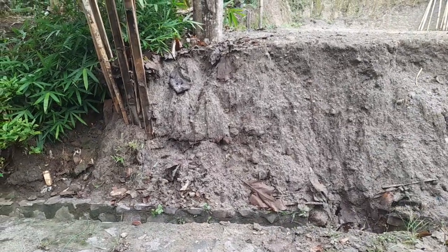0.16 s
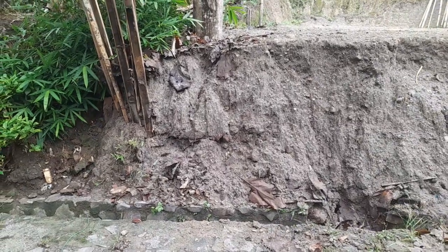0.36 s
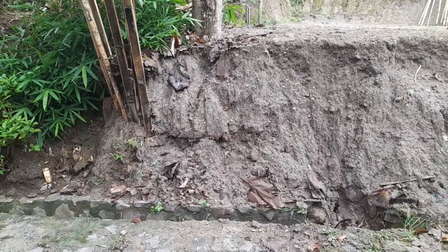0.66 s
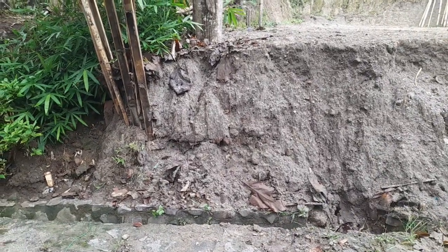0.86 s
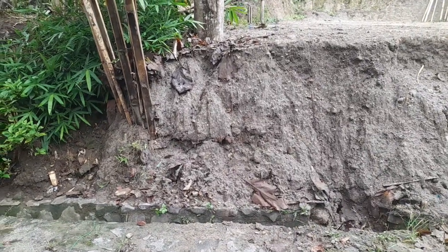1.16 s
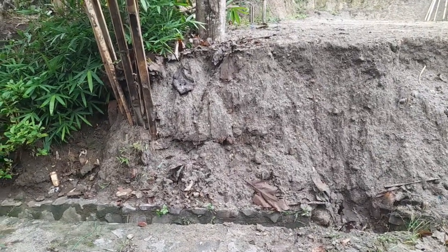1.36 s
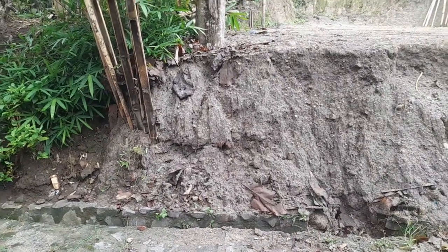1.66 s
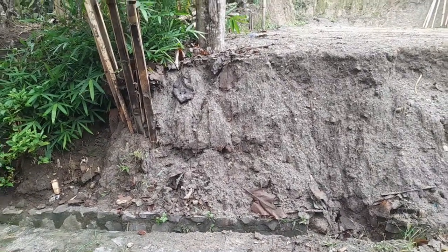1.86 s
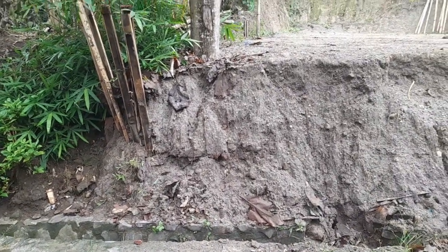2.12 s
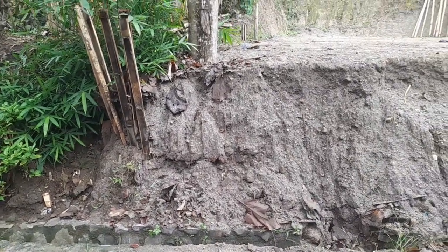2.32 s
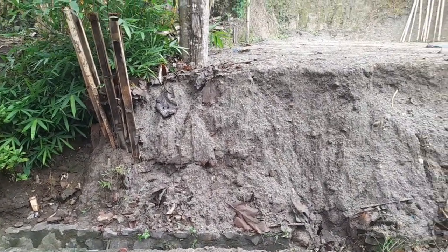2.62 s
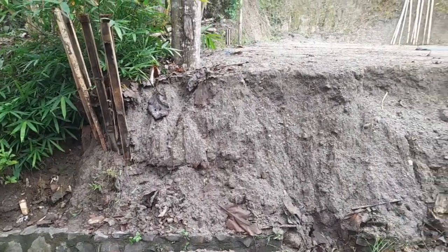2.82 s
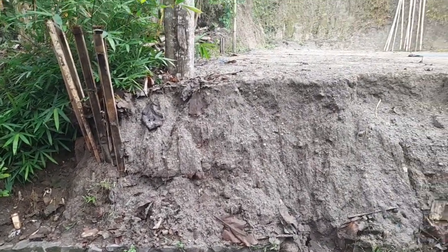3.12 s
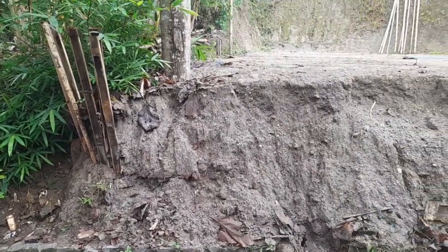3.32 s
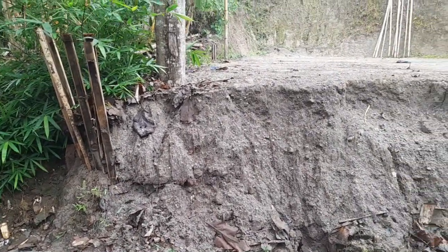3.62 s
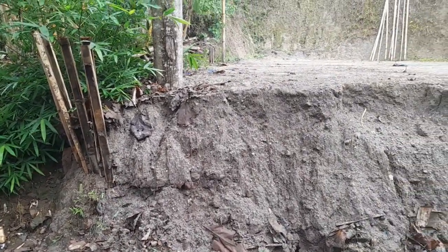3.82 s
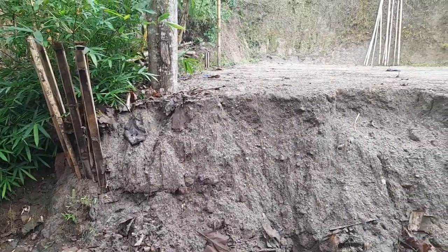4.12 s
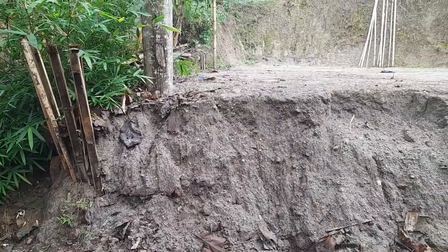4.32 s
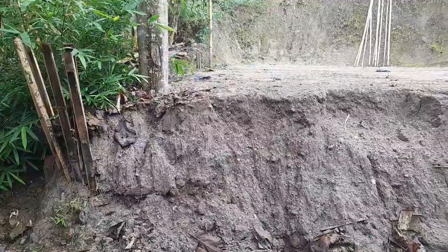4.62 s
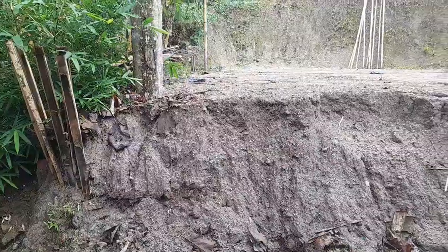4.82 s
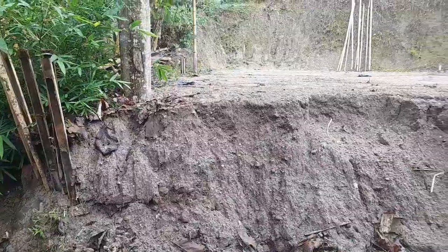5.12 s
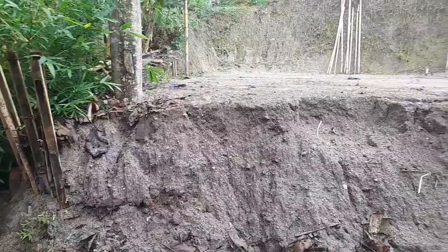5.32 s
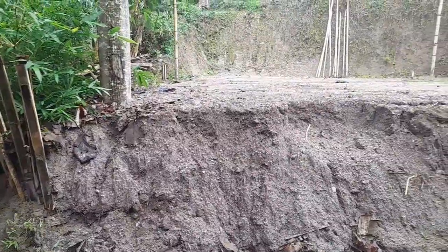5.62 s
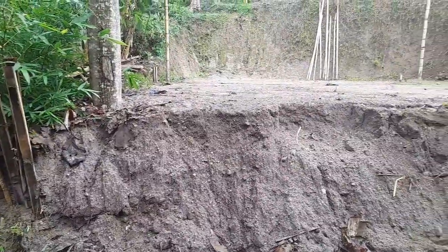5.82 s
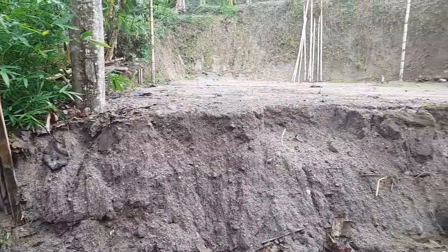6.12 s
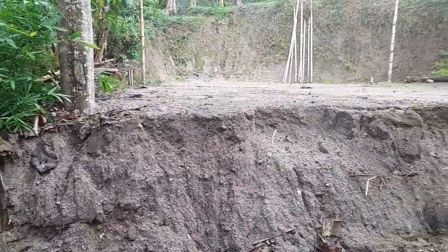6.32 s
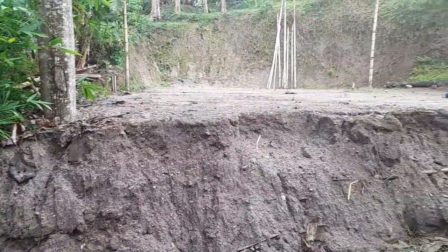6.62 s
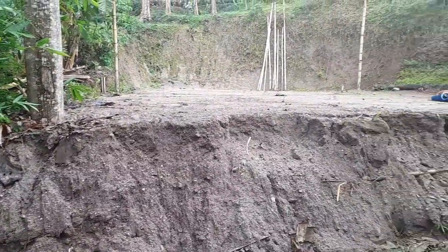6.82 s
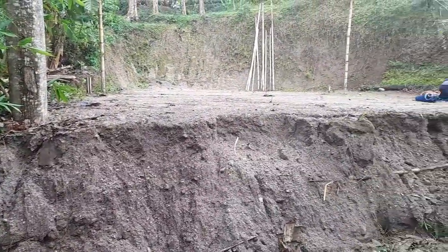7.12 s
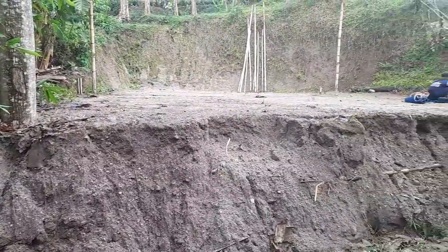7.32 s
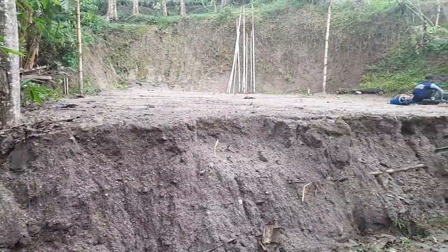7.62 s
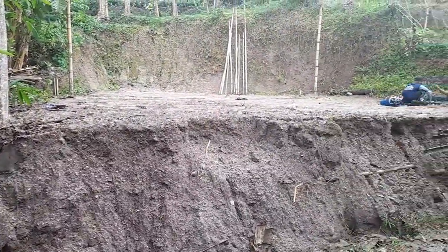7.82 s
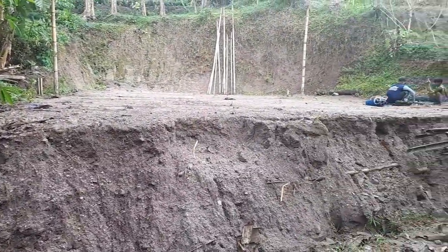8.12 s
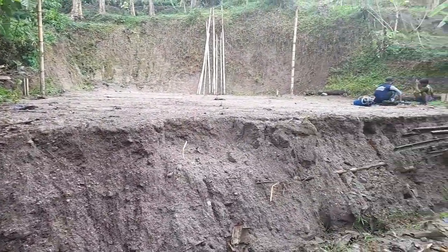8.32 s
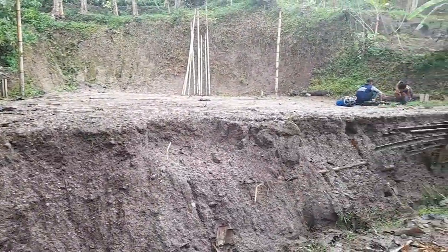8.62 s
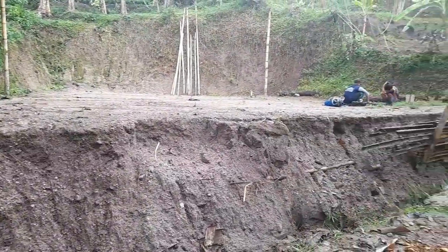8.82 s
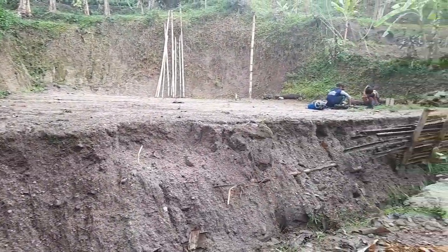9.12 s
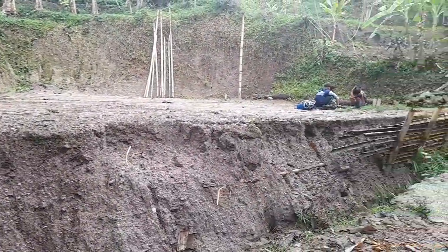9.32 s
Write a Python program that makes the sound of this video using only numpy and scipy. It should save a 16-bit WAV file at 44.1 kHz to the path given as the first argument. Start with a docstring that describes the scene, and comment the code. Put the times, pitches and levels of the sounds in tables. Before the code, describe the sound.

An open, leafy yard picked up by a handheld phone, with soft tree echoes. From 0 to 0.25 s a close rooster rasps, breaks into a clear, loud crow near 600 Hz that sinks until 1.2 s, and ends in a weaker hoarse croak by 1.3 s. Faint cheeps lie under it; from 1.65 to 3.3 s young fowl cheep brightly, four per second, each an arched chirp with a falling end. Dry ticks and scuffs sound nearby until about 3.3 s. From 3.5 to 6.2 s it is quieter: distant crows, a thin rising whistle near 5.2 s, far hoarse bursts, throbbing insects, low drone. Cheeps return from 6.4 to 7.9 s, overlapping, then weaker and irregular. From 8.1 s wind thumps low and lumpy to the end, with a far bird's quick scooping notes, falling calls and renewed rustle.

```python
"""Village yard with a rooster

A near rooster ends its crow hoarse, clear, then hoarse again: summed partials between bursts of rasp.
Young fowl cheep in gliding lines; small birds and far fowl are wavering tones with echoes from trees.
Shaped noise makes the throbbing insects mixed with the tops of cheeps, the blur of the cheeps' falling
ends, the air, a far drone, the rustle and ticks near the phone, and the gusts that thump its two
microphones in the last seconds."""
import sys
import numpy as np
from scipy import signal
from scipy.fft import rfft, irfft, next_fast_len
from scipy.io import wavfile
from scipy.ndimage import uniform_filter1d, map_coordinates

SR = 44100
rng = np.random.default_rng(int(sys.argv[2]) if len(sys.argv) > 2 else 0)


def generate_wav(sig):
    """Save sig (samples, or channels by samples) to the path in sys.argv[1] as 16-bit PCM at SR."""
    pcm = np.round(np.clip(np.atleast_2d(sig).T, -1, 1) * 32767).astype(np.int16)
    wavfile.write(sys.argv[1], SR, pcm)


N = 417186
T = np.arange(N) / SR

# Clear voice, held and then sinking: start_s, pitch_hz, level_db (before the throat), overtones_db (added)
CROW = [(.16, 580.6, -47, 2), (.2, 578, -42.5, 0.5), (.32, 612, -36, -3), (.43, 614.5, -35.5, -1),
        (.53, 618.5, -33, -14.5), (.594, 608.3, -35.5, -6.5), (.645, 592.7, -40, -5.5),
        (.69, 591.8, -37.5, -2), (.81, 573.6, -40.5, -4), (.92, 556.8, -47, 1.5), (1.096, 522, -61.5, 14),
        (1.164, 492, -58.5, 4.5), (1.21, 452, -62, 11)]
# Upper partials: partial_number, level_db (against the ninth)
UPPER_PARTIALS = [(9, -2.5), (10, -1.5), (11, -8), (12, -18), (14, -7.5)]
# Throat resonances; a partial swells as its pitch crosses a peak: frequency_hz, gain_db
THROAT = [(480, -9), (560, -10.5), (615, 1.5), (1100, -11.5), (1230, -11), (1580, -5), (1750, -16),
          (2150, -22.5), (2320, -6), (2400, -12.5), (2470, -17), (2900, -30.5), (3030, -11), (3110, -14),
          (3350, -9), (3700, -29.5), (4900, -41), (5500, -29.5)]
FADING_DB, FADING_PER_S = 1.8, 14.2  # moving air makes each overtone come and go


def clear_voice():
    """Source and filter: harmonics of one unsteady pitch, each weighted by the throat resonances."""
    hz, level_db, over_db = curves(CROW)
    phase = tone(hz, jitter=0.0023)
    stack = [(k, along(THROAT, k * hz)) for k in range(1, 7)]
    stack += [(k, along(THROAT, 9 * hz) + db) for k, db in UPPER_PARTIALS]
    voice = np.zeros(N)
    for k, throat_db in stack:
        partial_db = level_db + throat_db + 0.83 * wobble(25)
        if k > 1:
            partial_db += over_db + 2.7 * wobble(40.0) + FADING_DB * wobble(FADING_PER_S)
        voice += np.sqrt(2) * amp(partial_db) * np.sin(k * phase + k * k)
    return window(CROW) * voice


# The two rasps: start_s, lowest_resonance_db, upper_resonances_db, lowest_resonance_hz
RASP = [
    [(0.0, -40, -34.5, 707), (0.016, -34, -36.5, 690), (0.072, -37, -40, 688), (0.118, -32, -35.5, 689.7),
     (0.218, -48.5, -46, 639), (0.26, -79, -71, 634)],
    [(1.11, -78, -70, 738), (1.134, -50, -52.5, 720), (1.17, -48, -52, 682), (1.208, -65, -56, 759),
     (1.238, -45.5, -51.5, 754), (1.3, -87, -73, 763)],
]
# Upper resonances of the first and of the last rasp: frequency_hz, width_hz, level_db (relative)
BEAK = [(1524, 630, 2.5), (2145, 210, -0.5), (3360, 380, 0.5), (6390, 790, -24.5)], [(1435, 680, -5),
        (2440, 210, 4.5), (3350, 300, 1.5)]


def hoarse_voice():
    """Irregular vibration: the membranes lose their rhythm, and uneven air noise excites the resonances."""
    rasp = np.zeros(N)
    for rows, beak in zip(RASP, BEAK):
        low_db, high_db, low_hz = curves(rows)
        stutter = amp(1.5 * wobble(69.3))  # uneven bursts of air
        uneven_strength = np.tanh(0.76 + 0.77 * wobble(230))
        low = unit(uneven_strength * np.sin(tone(low_hz, jitter=0.02)))
        high = unit(filtered(stutter * rng.standard_normal(N), resonant(beak)))
        rasp += window(rows) * (amp(low_db) * low + amp(high_db) * high)
    return rasp


def rooster():
    """Superposition of direct and scattered sound for the clear and the hoarse voice."""
    # (Hz, left-right dB), then (Hz, radians the left port leads)
    lean = [(600, 0.0), (1250, -6.0), (1850, -7.5), (2400, -8), (3100, -6), (6000, -22)]
    skew = [(610, 0.73), (1220, 4.34), (1830, 4.7), (2440, 8.2), (3050, 11.4), (8000, 28.4)]
    spread = [(600, -6.0), (1200, 0), (3000, 2)]  # leaves scatter the higher partials more: (Hz, dB)
    voice, rasp = clear_voice(), hoarse_voice()
    clear = ports(voice + filtered(trees(voice), coloured(spread)), lean, skew)
    hoarse_lean = [(600, -4.0), (1500, -6.5), (3400, -8.0)]
    hoarse = ports(rasp + amp(-7.5) * trees(rasp), hoarse_lean, SKEW)
    return clear + hoarse


# One cheep at pace 1: start_s, even_fall_share and steep_fall_share (of the top pitch), level_db (relative),
# third_partial_db (relative), roughness (0-1, before each line's share)
CHEEP = [(0, 0.919, .94, -43, -12.5, .05), (.006, .915, 0.97, -6.5, -37, .05),
         (0.018, 0.94, 0.96, -4.5, -10, .05), (.024, 0.98, 0.98, 3.5, -11, 0.13),
         (.045, 0.96, 0.95, -1, -1.7, 0.37), (.065, .92, 0.98, 3.5, -3.5, 0.71),
         (.085, .85, .89, 4.5, -3.5, 0.37), (.105, .76, .72, 5, -10, 0.22),
         (0.117, .69, .6, -3.5, -14, 0.14), (0.127, 0.84, .55, -47, -24, .3)]
# All cheeps: start_s, top_pitch_hz, direct_db, echo_db (both before shape and throat), pace,
# lateness_of_fall (0-1)
CHEEPS = [(.195, 962, -56, -52.5, 1.58, 0.27), (.432, 960, -54.5, -54.5, 0.92, 0.79),
          (.672, 970, -54, -59, 1.24, 0.71), (.915, 967, -56, -58, 1.09, 0.82),
          (1.655, 873, -49, -52.5, 0.87, 0.27), (1.915, 912, -45.5, -51.5, 1.005, 0.23),
          (2.172, 920, -46.5, -54, 0.93, 0.03), (2.43, 913, -47.5, -51.5, 0.99, 0.08),
          (2.688, 900, -47.5, -50.5, 0.96, 0.21), (2.945, 877, -49.5, -54, 0.92, 0.81),
          (3.21, 887, -51.5, -53, 0.96, 0.32), (6.25, 890, -68.5, -66.5, 0.98, 0.26),
          (6.472, 944, -69.5, -57, 1.2, 0.8), (6.478, 877.5, -54.5, -52, 1.01, 0.53),
          (6.705, 980, -61, -56, 1.13, 0.86), (6.735, 909, -51, -53.5, 1.04, 0.76),
          (6.945, 990, -62, -59.5, 1.2, 0.72), (6.985, 917, -50, -54, 0.96, 0.91),
          (7.175, 977, -60, -65, 0.94, 0.84), (7.255, 917, -51.5, -51.5, 1.1, 0.89),
          (7.505, 900.5, -51, -54, 1.02, 0.99), (7.765, 885, -54.5, -50, 1.3, 0.84),
          (8.11, 605, -65, -56, 1, 0.4), (8.41, 735, -62, -61, 0.72, 0.48),
          (8.68, 900, -66, -62, 1.09, 0.5), (8.89, 959, -67, -58.5, 1.3, 0.83),
          (9.13, 1011, -62.5, -60, 1.34, 0.86), (9.38, 1027, -66, -56, 1.2, 0.65),
          (9.38, 865, -53, -47, 1.1, 0.98)]
# Throat resonances of the chick: frequency_hz, gain_db
SYRINX = [(1150, -37.5), (1400, -22), (1750, -8), (2200, -12), (2700, 1), (3400, 6), (4100, 10)]
# Hiss that rides on a cheep: frequency_hz, gain_db
BREATH = [(3600, -54.5), (4400, -6.5), (5000, -9), (6500, -10.5), (8500, -31), (15000, -44)]


def cheeps():
    """Two-voiced source and filter: two partials of a quick pitch arch and a steeper top line from the
    syrinx's other side pass the chick's throat, direct and as echo."""
    direct, echo = np.zeros(N + SR), np.zeros((2, N + SR))
    t = np.arange(SR // 5) / SR
    s, even, steep, shape_db, third_db, rough = np.transpose(CHEEP)
    flutter = np.pad([wobble(500) for k in range(3)], ((0, 0), (0, SR)))
    for i, (start, top_hz, direct_db, echo_db, pace, late) in enumerate(CHEEPS):
        at, now = round(start * SR), t * pace
        here = slice(at, at + len(t))
        # where the top line plunges late, the two partials sink gently
        slow = even + .12 * late * (1 - even)
        shapes = slow, slow, even + late * (steep - even)
        lines = [k * np.interp(now, s, shape) for k, shape in zip((2, 3, 4), shapes)]
        hz = top_hz * uniform_filter1d(lines, size=300)
        # as the pitch turns the voice breaks up, the top line most
        share = np.clip(np.interp(now, s, rough) * np.array([[.7], [.75], [1]]), 0, 1)
        breaking = 1 - share + share * flutter[:, here]
        waves = np.sin(2 * np.pi * np.cumsum(hz, axis=1) / SR)
        second, third, top_line = amp(along(SYRINX, hz)) * waves * breaking
        call = second + amp(np.interp(now, s, third_db)) * third + top_line
        call *= amp(np.interp(now, s, shape_db, right=-120))
        # the farther, higher chick: its falling tail is heard only as echo
        higher = top_hz > 935
        tail_db = higher * 270 * np.clip(now - .04, 0, 1)
        direct[here] += amp(direct_db - tail_db) * call
        echo[i % 2, here] += amp(echo_db) * call  # successive calls alternate between two echo patterns
    direct, echo = direct[:N], echo[:, :N]
    breath = uniform_filter1d(np.abs(echo.sum(0)), size=900) * rng.standard_normal(N)
    scatter = [(1500, -2.5), (2200, -3.5), (3000, 0.93)]  # (Hz, dB)
    echoes = filtered(trees(echo[0]) + trees(echo[1]), coloured(scatter))
    return direct + filtered(breath + trees(breath), coloured(BREATH)) + echoes


# Ticks near the phone: start_s, peak_db (before colour), left_right_db, knock_db (against the snap)
TICKS = [(0.2522, -64, -13.0, -18), (0.4374, -51, -7, -9), (0.738, -51.5, -13.5, -14),
         (1.0088, -51, -17, -4), (1.2418, -54.5, -20, -7), (1.3578, -53, -22.5, -14),
         (2.085, -48.5, -9.5, -6), (2.2574, -43.5, -24, -9.5), (2.3936, -53, -16, -11),
         (4.3875, -65, -5, -4)]
# Colour of the snap: frequency_hz, gain_db
SNAP = [(2000, -38), (5000, -4), (7500, 3.5), (9000, -3.5), (12000, -6), (15500, -7)]
# Colour of the duller knock: frequency_hz, gain_db
KNOCK = [(1200, -31), (2300, -2), (5000, 8), (7000, -17)]


def ticks():
    """Impulsive excitation: dry snaps of grit are decaying noise, some with a duller knock."""
    high, low, t = np.zeros((2, N)), np.zeros((2, N)), np.arange(300) / SR
    for s, db, pan_db, low_db in TICKS:
        here = slice(round(s * SR), round(s * SR) + len(t))
        decay = amp(db - 60 * t / 0.013)  # 60 dB in 13 ms
        snap = sides(pan_db)[:, None] * decay * rng.standard_normal(len(t))
        high[:, here] += snap
        low[:, here] += amp(low_db) * snap
    return filtered(high, coloured(SNAP)) + filtered(low, coloured(KNOCK))


# Steady part: start_s, body_db, hiss_db
RUSTLE = [(0, -73.5, -57.5), (.1, -66.5, -65), (1.0, -66, -61.5), (1.5, -80, -71), (2.2, -78, -70),
          (3.0, -77.5, -77), (3.5, -84, -79.5), (6.4, -81, -80.5), (7.3, -80.5, -77.5), (8.0, -78, -77.5),
          (8.55, -65.5, -74.5), (9.0, -75.5, -76.5), (9.46, -65.5, -76)]
# Single scuffs: start_s, level_db, hold_s
SCUFFS = [(.34, -65.5, 0.13), (1.24, -68, 0.011), (1.76, -59, 0.013), (2.0, -82, 0.029),
          (2.53, -58.5, 0.14), (2.94, -67.5, 0.0073), (3.28, -67, 0.026)]
# Spectrum of the body: frequency_hz, level_db_per_hz (relative)
BODY = [(200, -10), (350, -9), (700, -10), (1200, -14.5), (2000, -13.5), (3000, -42)]
# Spectrum of the hiss: frequency_hz, level_db_per_hz (relative)
HISS = [(2470, -39.5), (4200, -0.5), (4390, -13), (5370, -1), (6760, -7), (8150, -14), (10300, -7.5),
        (11000, -14), (14000, -14), (15500, -17.5)]
SCUFF_HISS_DB = -11.5  # hiss of a scuff against its body


def rustle():
    """Friction noise of feet and clothing near the phone: a body and a grainy hiss."""
    body_db, hiss_db = curves(RUSTLE)
    scuffs = swells(SCUFFS, rise_s=0.053, fall_s=0.12)
    grain = amp(1.02 * wobble(150) + 0.73 * wobble(11.0))
    body = (amp(body_db) + scuffs) * rush(coloured(BODY), patchy_db=2.5)
    hiss_gain = amp(hiss_db) + amp(SCUFF_HISS_DB) * scuffs
    hiss = hiss_gain * unit(grain * rush(coloured(HISS), patchy_db=3.5))
    return body * sides(-7.0)[:, None] + hiss * sides(-3.5)[:, None]


# Gusts on the microphones: start_s, level_db (before the random lumps), hold_s
GUSTS = [(8.06, -54.5, 0.046), (8.15, -46, 0.089), (8.265, -48, 0.05), (8.4, -46, 0.071),
         (8.49, -42.5, .06), (8.58, -47, 0.038), (8.67, -50, .06), (8.775, -44.5, 0.054),
         (8.87, -51.5, 0.073), (9.02, -48, .06), (9.15, -51.5, 0.081), (9.285, -48, 0.065),
         (9.395, -46, 0.067)]
# Spectrum of a gust: frequency_hz, level_db_per_hz (relative)
THUMP = [(15, -45), (25, -36), (43, -2), (102, 6), (254, -15.5), (393, -18.5), (454, -28), (533, -36),
         (616, -24), (800, -79), (1040, -70), (1760, -120)]


def gusts():
    """Turbulent pressure at the microphones: low noise that arrives in lumps."""
    lumps = swells(GUSTS, rise_s=0.027, fall_s=.07) * amp(2.5 * wobble(25))
    return lumps * rush(coloured(THUMP), patchy_db=1.0) * sides(-4.5)[:, None]


# A far bird's scooping notes: start_s, level_db (before fading and the direct and echo gains),
# held_pitch_hz, starting_pitch_share, hold_s
SCOOPS = [(8.332, -54, 1277, 0.76, 0.11), (8.478, -58.5, 1198, 0.87, .01),
          (8.533, -50.5, 1215, 0.87, 0.023), (8.602, -54.5, 1160, .76, 0.045), (8.699, -58, 1209, .77, .09),
          (8.822, -55, 1217, 0.8, 0.11), (8.949, -53.5, 1215, .98, 0.078), (9.079, -60, 1240, 0.77, 0.16),
          (9.207, -58, 1215, .98, 0.044), (9.351, -59.5, 1200, 0.72, .08)]
SLIDE_HZ_PER_S, SAG = 16900, .05  # SAG: share by which the pitch dips during the accent
ACCENT_S, ACCENT_DB, SCOOP_FADE_DB_PER_S = 0.019, 11.5, 46


def scoops():
    """Frequency modulation: each note slides to its pitch, lands with an accent, then holds softer and fades."""
    notes = []
    for s, db, hz, share, hold in SCOOPS:
        top = s + abs(1 - share) * hz / SLIDE_HZ_PER_S + .001
        settled, soft_db = top + 1.4 * ACCENT_S, db - ACCENT_DB
        notes.append([(s, share * hz, db - 6.5),
                      (top, hz, db),
                      (top + ACCENT_S, (1 - SAG) * hz, db - ACCENT_DB / 2),
                      (settled, hz, soft_db),
                      (settled + hold, hz, soft_db - SCOOP_FADE_DB_PER_S * hold)])
    return far_calls(notes, jitter=0.0104, dry_db=-2.0, wet_db=-4.5, fading_db=1.8)


# Rising whistles: start_s, length_s, first_hz, last_hz, level_db (before fading and direct and echo gains)
WHISTLES = [(.5, 0.21, 4000, 5230, -70), (3.17, 0.26, 3800, 5410, -62.5), (5.165, .29, 3930, 5390, -64),
            (5.2, 0.28, 2880, 3560, -75.5), (7.69, 0.31, 3830, 5330, -69)]


def whistles():
    """Frequency modulation: small birds whistle single tones that glide upward."""
    notes = glides(WHISTLES, bend=1.5, loudest=0.57, edge_db=16.5)
    return far_calls(notes, jitter=0.00286, dry_db=3.0, wet_db=4.6, fading_db=5)


# Falling calls of far fowl: start_s, length_s, first_hz, last_hz,
# level_db (before fading and the direct and echo gains)
FALLS = [(5.9, 0.059, 2720, 2597, -67), (6.27, 0.19, 3550, 2380, -71), (8.48, .2, 3290, 2190, -60.5),
         (8.9, .16, 3670, 2276, -62)]


def falling_calls():
    """Frequency modulation: far fowl call in sinking tones, with more echo than direct sound."""
    notes = glides(FALLS, bend=1.3, loudest=0.61, edge_db=6.5)
    return far_calls(notes, jitter=0.026, dry_db=-0.5, wet_db=4.0, fading_db=4)


# One far phrase, one partial carrying: start_s (within the phrase), pitch_hz, level_db (relative)
FAR_CROW = [(0, 1153, 0), (.07, 1172, -3), (.12, 1150, -8.5), (.2, 1027, -7), (.36, 985, -12),
            (.44, 1088, -4), (.5, 1085, -18), (.55, 1086, -22)]
# Its two soundings: start_s, level_db (before fading and the direct and echo gains)
FAR_CROWS = [(3.639, -70.5), (6.75, -62.5)]
# Further far calls, slow held crows and low hoots: start_s, pitch_hz, level_db (before fading and direct and
# echo gains)
LOW_CROWS = [
    [(1.62, 717, -75), (1.66, 717, -64), (1.7, 725, -86), (1.85, 773, -74), (2.13, 773, -88),
     (2.25, 775, -68.5), (2.49, 742, -84)],
    [(4.98, 872, -81), (5.2, 984, -69.5), (5.3, 1048, -73.5), (5.45, 1110, -72.5), (5.7, 1110, -78),
     (5.8, 1094, -84)],
    [(8.54, 620, -72), (8.63, 606, -66), (8.72, 606, -78)],
    [(8.6, 440, -74), (8.7, 466, -61), (8.83, 443, -73)],
]
# A far rooster's hoarse bursts: start_s, level_db, hold_s
FAR_RASP = [(5.27, -70, 0.36), (5.7, -66.5, 0.08), (5.95, -71.5, .03), (6.27, -72.5, 0.024)]
# Resonances of the hoarse bursts: frequency_hz, width_hz, level_db (relative)
FAR_THROAT = [(770, 170, -8.5), (1148, 280, 1.5), (1400, 300, -0.5), (1750, 380, -20)]


def far_roosters():
    """One audible partial per distant crow, with hoarse bursts as resonance-filtered noise."""
    rasp = swells(FAR_RASP, rise_s=0.1, fall_s=0.12) * rush(resonant(FAR_THROAT), patchy_db=5.5)
    crows = [np.add(FAR_CROW, (s, 0, db)) for s, db in FAR_CROWS]
    return rasp + far_calls(crows + LOW_CROWS, jitter=0.024, dry_db=-5, wet_db=-2, fading_db=4.5)


# Level of throbbing noise near 4.7 kHz, insects mixed with the tops of cheeps:
# start_s, level_db (before the throb and random wavering)
THROBBING = [(0, -84), (1.0, -90), (1.7, -63), (3.35, -67.5), (3.6, -70), (4.1, -81), (5.0, -71),
             (5.4, -67), (6.3, -63.5), (7.5, -61), (8.1, -69.5), (9.46, -69.5)]
# Resonances of the throbbing noise, then of the blurred noise: frequency_hz, width_hz, level_db (relative)
NOISE_BANDS = [(4667, 790, 0)], [(2337, 450, 0)]
THROBS_PER_S, THROB_AT_S, THROB_DB = 4.2, 5.8, 2.5  # the throb lowers the level by up to twice THROB_DB


def insects_and_cheep_tops():
    """Amplitude modulation: resonant noise of insects and the tops of cheeps throbs at a steady rate."""
    throb = THROB_DB * (np.cos(2 * np.pi * THROBS_PER_S * (T - THROB_AT_S)) - 1)
    level_db = curves(THROBBING)[0] + throb + 1.7 * wobble(6.9)
    return amp(level_db) * rush(resonant(NOISE_BANDS[0]), patchy_db=3.5)


# Swells of blurred noise near 2.3 kHz, many with the falling ends of cheeps: start_s, level_db, hold_s
BLUR = [(1.2, -58.5, .06), (1.76, -62.5, 0.027), (2.2, -71, 0.037), (2.52, -66, 0.06), (2.9, -69, .05),
        (3.3, -65.5, 0.034), (3.7, -70.5, 0.055), (4.08, -69.5, 0.074), (4.56, -74.5, 0.14),
        (5.08, -71.5, 0.028), (5.26, -79, .02), (5.54, -70.5, 0.046), (5.98, -72, 0.023), (6.4, -72, .05),
        (6.82, -65.5, 0.14), (7.08, -62.5, 0.024), (7.32, -68.5, 0.03), (7.52, -63.5, 0.12),
        (8.0, -61.5, 0.18), (8.61, -58.5, 0.056), (9.05, -62, 0.23)]
BLUR_BED_DB = -77.5


def cheep_blur():
    """Resonant noise under envelopes: it swells with the falling ends of cheeps, over a steady bed."""
    gain = amp(BLUR_BED_DB) + swells(BLUR, rise_s=0.25, fall_s=0.11)
    return gain * rush(resonant(NOISE_BANDS[1]), patchy_db=3.5)


# Spectrum of the yard's air: frequency_hz, level_db_per_hz (relative)
AIR = [(240, -49), (400, -34.5), (727, -35.5), (914, -27), (1820, -29.5), (2440, -12.5), (2970, -6),
       (3680, -9), (4430, -22.5), (4710, -12), (5660, -6.5), (7010, -10.5), (8420, -38), (13500, -23),
       (15500, -30.5)]
AIR_DB = -69


def yard_air():
    """Stationary broadband noise: the steady air of the yard."""
    return amp(AIR_DB) * rush(coloured(AIR), patchy_db=3.5)


# Level of the far drone, before random wavering and balance: start_s, level_db
DRONE = [(0, -58.5), (.6, -59), (1.2, -59.5), (1.6, -68.5), (2.0, -63.5), (2.6, -62.5), (3.3, -62),
         (4.15, -68), (4.6, -66), (5.4, -69.5), (6.4, -69), (6.7, -64), (7.6, -69), (7.85, -62.5),
         (8.1, -77.5), (8.5, -62), (9.46, -63)]
# Spectrum of the drone: frequency_hz, level_db_per_hz (relative)
LOWS = [(18, -41.5), (30, -28), (48, -1.5), (81, -3), (138, -1), (254, -10), (357, -17.5), (382, -22.5),
        (700, -47), (910, -61), (1540, -120)]
DRONE_PAN_DB = -10  # left against right


def drone():
    """Low-pass noise: a far drone of slowly changing level."""
    level_db = curves(DRONE)[0] + 0.42 * wobble(11)
    return amp(level_db) * sides(DRONE_PAN_DB)[:, None] * rush(coloured(LOWS), patchy_db=2.0)


def far_calls(tables, jitter, dry_db, wet_db, fading_db):
    """Propagation over distance: wavering tones, part echo; moving air fades the direct part in and out."""
    line = np.zeros(N)
    for rows in tables:
        hz, db = curves(rows)
        line += window(rows) * np.sqrt(2) * amp(db) * np.sin(tone(hz, jitter))
    return amp(dry_db + fading_db * wobble(35)) * line + amp(wet_db) * trees(line)


# Reverberation among the trees: frequency_hz, t60_s
TREES = [(500, 0.52), (3000, 0.73), (8000, 0.97)]


def trees(x):
    """Reverberation by convolution: trunks and the earth bank echo, in a new random pattern each time."""
    hz, t, z = signal.stft(rng.standard_normal((2, SR)), SR, nperseg=256)
    decay = amp(-60 * t / along(TREES, hz)[:, None])
    tail = signal.istft(z * decay, SR, nperseg=256)[1]
    delayed = np.pad(x, (400, 0))[None]  # samples before the first echo
    return signal.fftconvolve(delayed, tail / np.linalg.norm(tail[0]), axes=1)[:, :N]


# Likeness of the two ports in diffuse noise: frequency_hz, correlation
ALIKE = [(40, 0.89), (130, 1), (290, 0.85), (640, 0.2), (1400, 0.69), (3000, 0.26), (7000, 0.074),
         (15000, 0.014)]


def rush(colour, patchy_db):
    """Partial coherence: stereo noise of rms 1 with patches of random gain."""
    z = signal.stft(rng.standard_normal((2, N)), nperseg=512)[2]
    field = uniform_filter1d(uniform_filter1d(rng.standard_normal(z.shape[1:]), 6, 0), 14, 1)
    pair = signal.istft(z * amp(patchy_db * unit(field)), nperseg=512)[1][:, :N]

    def mid_side(hz):
        turn = np.arccos(np.clip(along(ALIKE, hz), -1, 1)) / 2
        return colour(hz) * [np.cos(turn), np.sin(turn)]

    mid, side = filtered(pair, mid_side)
    return unit(np.array([mid + side, mid - side]))


# Balance of the ports: frequency_hz, left_right_db
PORTS = [(60, -9), (110, -11.0), (200, -21.5), (380, -3.5), (700, -5.5), (1290, -9.5), (2380, -16),
         (4400, -9.5), (8120, -14.5), (15000, 5.5)]
# Lead of the left port: frequency_hz, phase_rad
SKEW = [(60, .1), (400, 0.59), (650, 0.54), (1200, 2.05), (1700, 3.83), (2300, 4.6), (3300, 8.5),
        (6000, 20), (15000, 33)]


def ports(x, balance, skew):
    """Phase and level differences: sound leads at the left port and differs in strength."""
    def response(hz):
        half_lead = .5j * along(skew, hz) * np.array([[1], [-1]])
        return sides(along(balance, hz)) * np.exp(half_lead)

    return filtered(x, response)


def sides(db):
    """Level difference: gains of left and right for a left-right dB, their mean 1."""
    left = amp(db)
    return np.array([2 * left, 2 + 0 * left]) / (1 + left)


def swells(rows, rise_s, fall_s):
    """Energy sum of events that rise, hold and fall; rise and fall cover 17.75 dB in their time."""
    power = 0
    for s, db, hold in rows:
        outside = np.clip(np.maximum((s - T) / rise_s, (T - s - hold) / fall_s), 0, 9)
        power = power + amp(2 * db - 35.5 * outside)
    return np.sqrt(power)


def glides(rows, bend, loudest, edge_db):
    """Decelerating glide: pitch slows towards its goal; the level peaks part of the way through."""
    u = np.linspace(0, 1, 9)
    notes = []
    for s, length, first, last, db in rows:
        hz = first + (last - first) * (1 - (1 - u) ** bend)
        level_db = db - edge_db * ((u - loudest) / loudest) ** 2
        notes.append(np.transpose([s + length * u, hz, level_db]))
    return notes


def tone(hz, jitter):
    """Phase as the integral of a slightly unsteady frequency."""
    return 2 * np.pi * np.cumsum(hz * (1 + jitter * wobble(60))) / SR


def wobble(rate):
    """Band-limited randomness: a smooth random curve, rate knots a second."""
    return map_coordinates(rng.standard_normal(int(N * rate / SR) + 4), [T * rate])


def filtered(x, response):
    """Linear filtering: the spectrum of x times a complex response of frequency."""
    m = next_fast_len(N + SR // 2)
    return irfft(rfft(x, m) * response(np.fft.rfftfreq(m, 1 / SR)), m)[..., :N]


def resonant(modes):
    """Parallel resonances, each applied twice for dark valleys."""
    def response(f):
        return sum(amp(db) * (1j * f * w / (c * c - f * f + 1j * f * w)) ** 2 for c, w, db in modes)

    return response


def coloured(points):
    """Spectral envelope given as (Hz, dB) points."""
    return lambda f: amp(along(points, f))


def along(points, hz):
    """Interpolation of (Hz, value) points on a logarithmic frequency axis."""
    f, v = np.transpose(points)
    return np.interp(np.log(hz + 1), np.log(f + 1), v)


def curves(rows):
    """Linear interpolation in time: one value per sample for each column after the time."""
    s, *cols = np.transpose(rows)
    return [np.interp(T, s, c) for c in cols]


def window(rows, fade=0.018):
    """Time gate: 1 between the first and last row, with short fades (s) outside."""
    return np.clip(np.minimum(T - rows[0][0] + fade, rows[-1][0] + fade - T) / fade, 0, 1)


def amp(db):
    """Decibel law: amplitude gain of a level in dB."""
    return 10 ** (np.asarray(db) / 20)


def unit(x):
    """Normalisation: x at rms 1."""
    return x / np.sqrt(np.mean(x ** 2) + 1e-20)


def scene():
    """Superposition of all sources at the two ports."""
    birds = cheeps() + scoops() + whistles() + falling_calls()
    distance = far_roosters() + insects_and_cheep_tops() + cheep_blur() + yard_air()
    return rooster() + ports(birds + distance, PORTS, SKEW) + rustle() + gusts() + drone() + ticks()


# Microphone colour: frequency_hz, gain_db
CAPSULE = [(5800, -1.12), (6280, -7), (6800, 3.5), (7800, 0), (8050, -9), (9000, -2.5)]
TOP_HZ = 15700  # nothing is kept above


def record(dry):
    """Transducer response: two dips in the treble, a steep cut of the deepest bass and a band limit."""
    def response(hz):
        bass_cut = np.sqrt(1 + (44 / (hz + 1)) ** 8)  # corner near 44 Hz
        return amp(along(CAPSULE, hz)) * (hz < TOP_HZ) / bass_cut

    return filtered(dry, response)


dry = scene()
out = record(dry)
generate_wav(out)
```